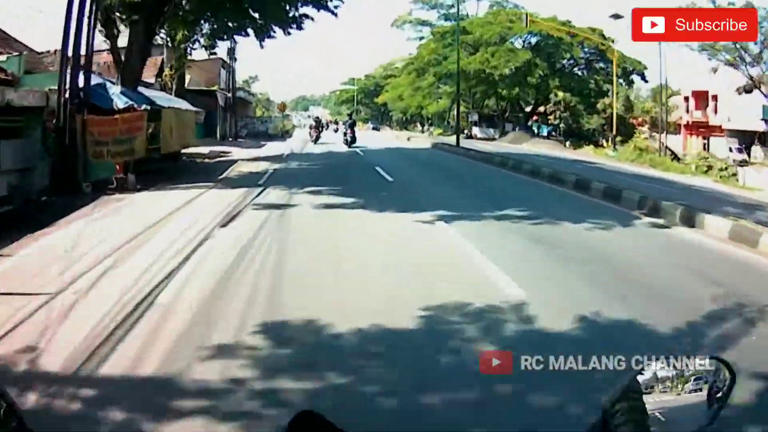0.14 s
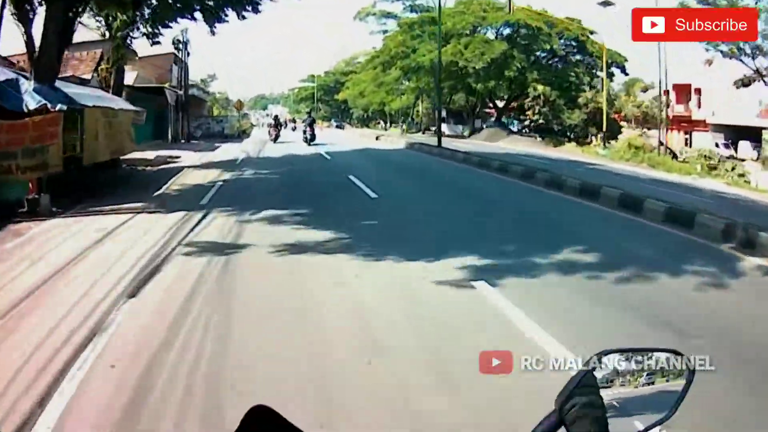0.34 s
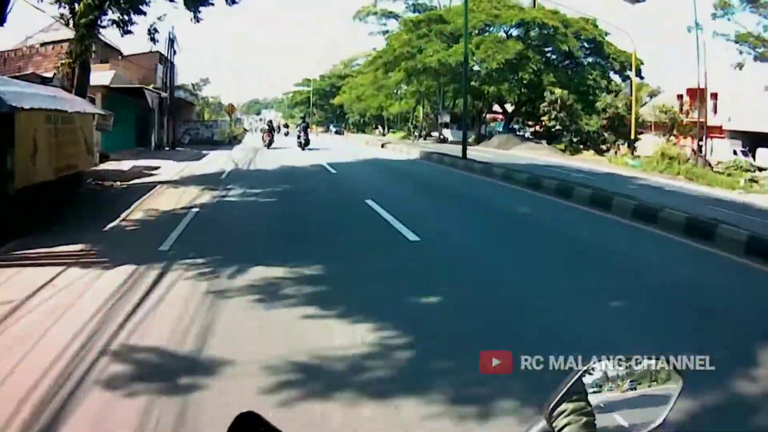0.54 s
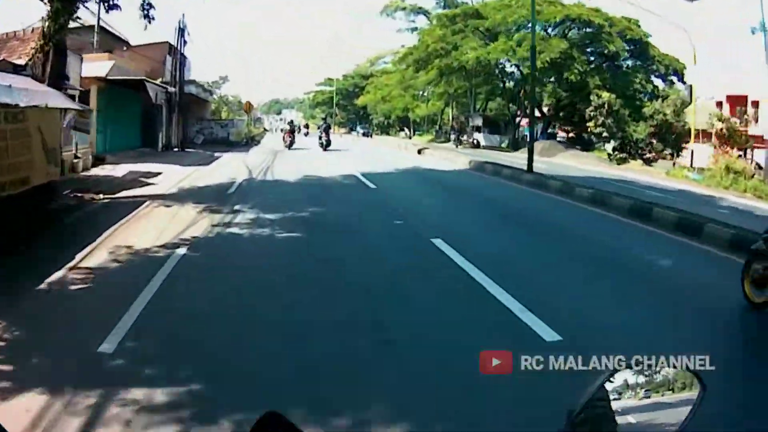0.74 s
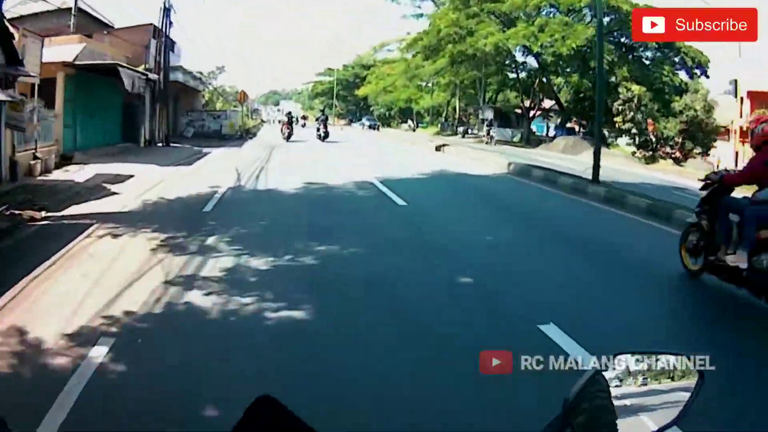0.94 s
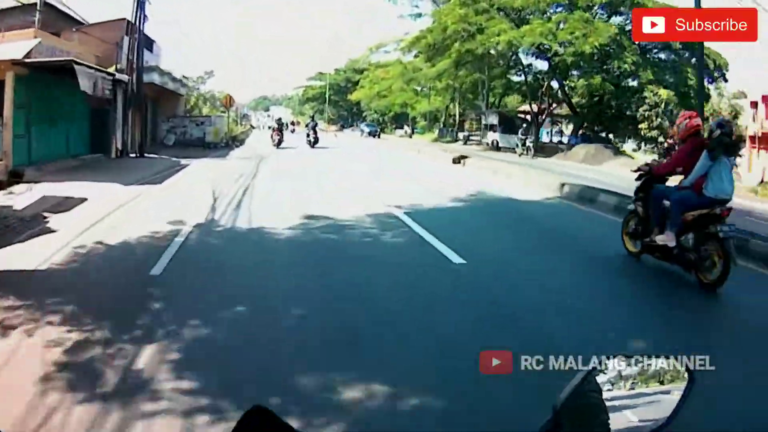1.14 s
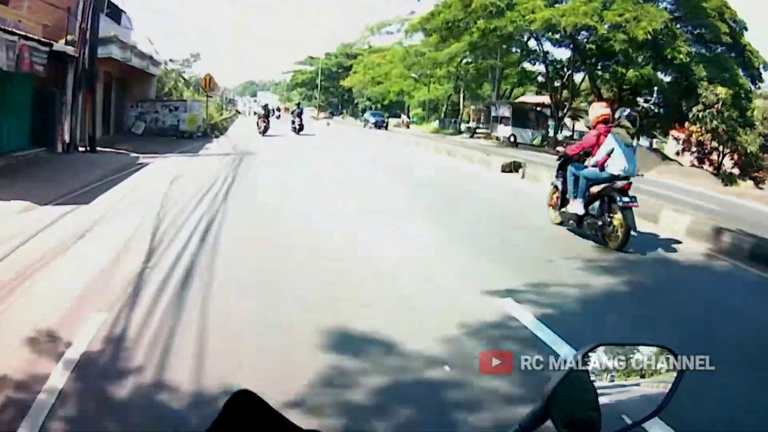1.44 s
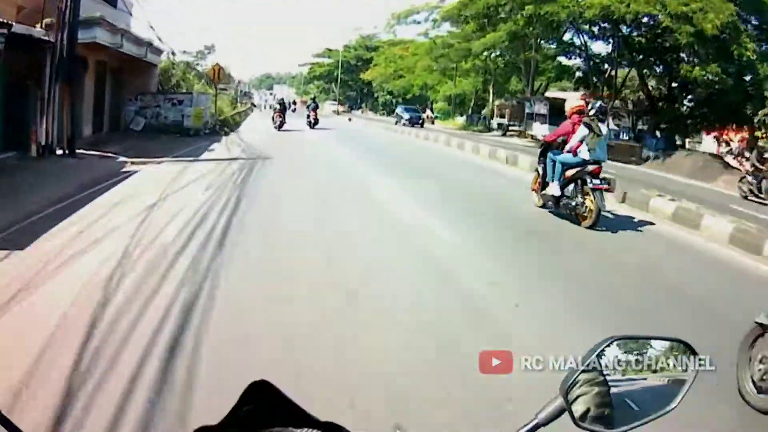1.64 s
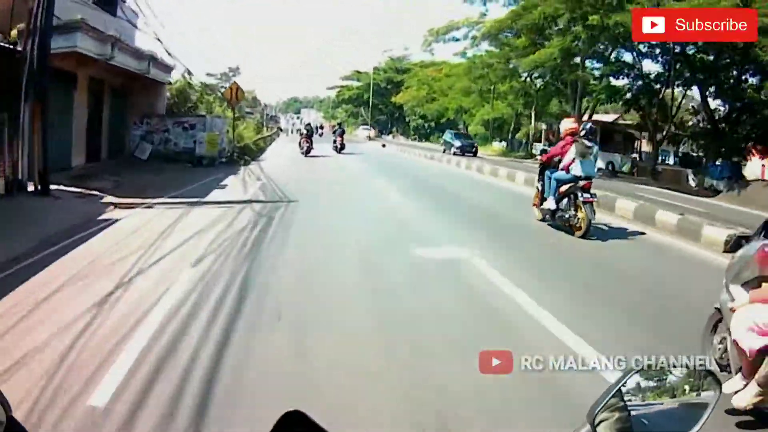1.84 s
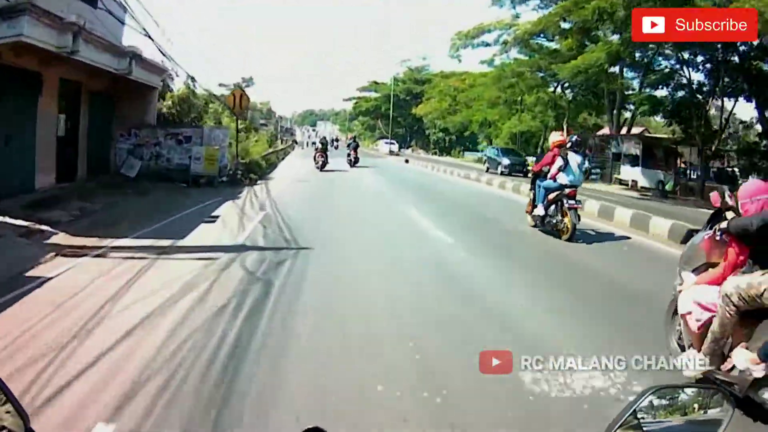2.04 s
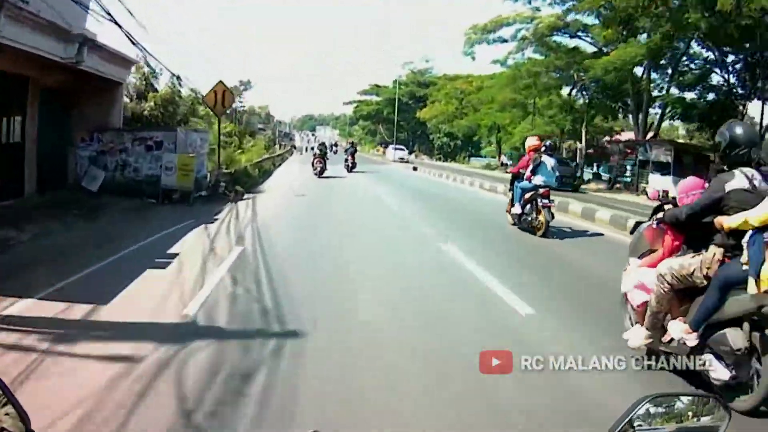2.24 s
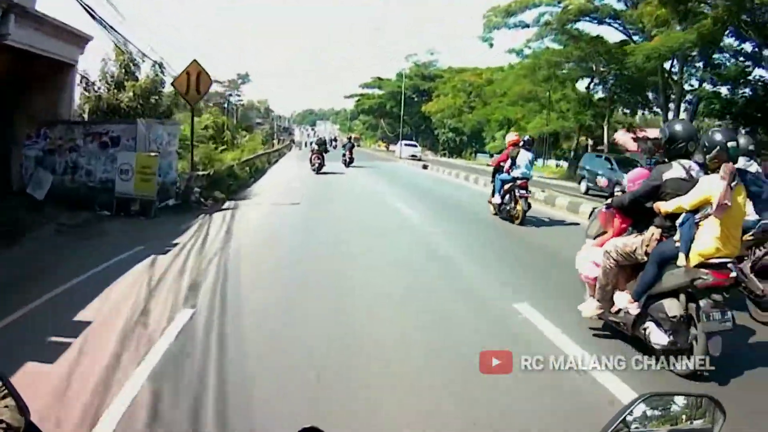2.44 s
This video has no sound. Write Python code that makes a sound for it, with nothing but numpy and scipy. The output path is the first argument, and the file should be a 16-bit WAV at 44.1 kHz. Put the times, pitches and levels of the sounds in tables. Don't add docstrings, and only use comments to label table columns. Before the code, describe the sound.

A single-cylinder motorcycle cruises with a low, slightly unsteady exhaust drone from the start, sagging, revving up a little around 1 s, then easing back to the end. Wind rumbles and thuds constantly on the small rider-worn microphone, ducking the road hiss in gusts. Breathy air whistle enters near 0.4 s; other bikes' tyre roar swells at 0.45 and, strongest, 1.55 s. A tiny tick comes at 2.44 s.

```python
import sys
import numpy as np
from scipy import signal
from scipy.io import wavfile

SR = 44100
rng = np.random.default_rng(int(sys.argv[2]) if len(sys.argv) > 2 else 0)


def natural_amplitude(level_db):
    exponent = np.asarray(level_db, float) / 20
    return 10 ** exponent


def digitize_waveform(pressure):
    field = np.atleast_2d(pressure).T
    bounded = np.clip(field, -1, 1)
    quanta = np.round(bounded * 32767).astype(np.int16)
    wavfile.write(sys.argv[1], SR, quanta)


N = 114660


def rms_one(x):
    return x / np.sqrt(np.mean(x ** 2) + 1e-20)


def in_time(rows):
    s, *columns = np.transpose(rows)
    return [np.interp(np.arange(N) / SR, s, c) for c in columns]


def bump(centre_s, length_s):
    return np.exp(-.5 * ((np.arange(N) / SR - centre_s) / (length_s / 2)) ** 2)


def drift(rate_hz):
    r = np.exp(-80 * np.pi * rate_hz / SR)
    white = rng.standard_normal(N // 40 + 2002)
    slow = signal.lfilter([1], [1, -2 * r, r * r], white)[2000:]
    return np.interp(np.arange(N) / 40, np.arange(len(slow)), rms_one(slow - slow.mean()))


def resonance(x, hz, width_hz):
    r = np.exp(-np.pi * width_hz / SR)
    b = np.array([1, 0, -1]) * (1 - r * r) / 2
    return signal.lfilter(b, [1, -2 * r * np.cos(2 * np.pi * hz / SR), r * r], x)


def banded_noise(spectrum, shared_db, own_db, rate_hz):
    hz, db = np.transpose(spectrum)
    edges_hz = 20 * 2 ** np.arange(0, 9.7, 1 / 3)
    white = rng.standard_normal((2, N + SR))
    together = drift(rate_hz)
    out = 0
    for k, (low, high) in enumerate(zip(edges_hz, edges_hz[1:])):
        level_db = np.interp(np.log(low * high) / 2, np.log(hz), db, left=-150, right=-150)
        sos = signal.butter(3, [low, high], "band", fs=SR, output="sos")
        band = signal.sosfilt(sos, white[k % 2])[SR:]
        out = out + natural_amplitude(level_db + shared_db * together + own_db * drift(rate_hz)) * band
    return rms_one(out)


def sliding_noise(rows, width_hz):
    centre_hz, level_db = in_time(rows)
    cut = signal.butter(2, width_hz / 2, fs=SR, output="sos")
    a, b = signal.sosfilt(cut, rng.standard_normal((2, N)))
    phase = 2 * np.pi * np.cumsum(centre_hz) / SR
    return natural_amplitude(level_db + 0.46 * drift(39.0)) * rms_one(a * np.cos(phase) + b * np.sin(phase))


def squeeze(x, limit_db, share):
    attack_s, release_db_per_s = .003, 300
    fall_db = release_db_per_s * np.arange(N) / SR
    held_db = np.maximum.accumulate(20 * np.log10(np.abs(x) + 1e-9) + fall_db) - fall_db
    r, ahead = np.exp(-1 / (attack_s * SR)), int(attack_s * SR)
    cut_db = signal.lfilter([1 - r], [1, -r], np.maximum(held_db - limit_db, 0) * share)
    return x * natural_amplitude(-np.append(cut_db[ahead:], np.full(ahead, cut_db[-1])))


# start_s, fourth_order_hz (of firing rate), fourth_order_db, second_order_db (re mean fourth)
ENGINE_RUN = [(0, 184, -19, -16), (.12, 180, -21, -9), (.35, 172, -18.5, -6.5), (.47, 179, -21, -1.5),
              (.68, 172, -20, -18.5), (.85, 184, -22, -7.5), (.95, 196, -25.5, -17.5), (1.1, 196, -22, 4.5),
              (1.25, 194, -26.5, 2.5), (1.45, 192.5, -23, 7.5), (1.62, 191, -18.5, 13.5),
              (1.78, 189.7, -22.5, -10), (1.95, 190, -21.5, -8), (2.08, 186, -17.5, 1),
              (2.2, 185, -22, -8.5), (2.35, 185.5, -17.5, 7.5), (2.5, 184.5, -18, -10.5),
              (2.6, 181, -20, 3)]
# multiple_of_firing_rate, level_db (re mean fourth)
WEAK_ORDERS = [(1, -7), (3, -9), (5, -10), (6, -10), (8, -24), (10, -17), (15, -22), (29, -27), (30, -28),
               (35, -34)]
# centre_s, length_s, rise_db
BOOM_SWELLS = [(0.133, 0.13, 6), (0.348, 0.14, 9), (0.584, 0.11, 8.5), (0.717, 0.072, 6), (0.842, 0.027, 5),
               (1.204, .09, 10), (1.315, 0.021, 8), (1.378, 0.022, 13.5), (1.538, .11, 12),
               (1.725, 0.11, 12.5), (1.906, 0.088, 11), (2.036, 0.054, 2.5), (2.214, 0.24, 9),
               (2.551, 0.064, 4)]


def exhaust_drone(turn, fourth_db, second_db):
    mean_db = fourth_db.mean()
    boom_db = np.max([rise_db * bump(s, length_s) for s, length_s, rise_db in BOOM_SWELLS], axis=0)
    orders = [(4, fourth_db + boom_db), (2, mean_db + second_db)]
    orders += [(round(k), mean_db + db) for k, db in WEAK_ORDERS]
    drone = 0
    for k, db in orders:
        level = np.sqrt(2) * natural_amplitude(db + 2.0 * drift(2.4))
        drone = drone + level * np.sin(2 * np.pi * (k * turn + rng.random()))
    return drone


# centre_hz, width_hz, level_db
PIPE_MODES = [(438, 360, -8), (709, 117, -1.5), (1176, 880, -1), (1640, 760, -18.5), (2190, 1200, -6.5)]


def exhaust_bark(turn):
    jitter, spread_db, puff_share, decay_per_firing = .015, 1.6, .85, 1.8
    shaky = np.maximum.accumulate(turn + jitter * drift(22.0))
    strength = natural_amplitude(spread_db * rng.standard_normal(200))[shaky.astype(int) + 1]
    pulses = np.diff(np.floor(shaky), prepend=0) * strength
    puffs = strength * np.exp(-decay_per_firing * (shaky % 1)) * rng.standard_normal(N)
    source = (1 - puff_share) * rms_one(pulses) + puff_share * rms_one(puffs)
    bark = 0
    for k, (hz, width_hz, db) in enumerate(PIPE_MODES):
        mode = resonance(resonance(source, hz, width_hz), hz, 2 * width_hz)
        bark = bark + (-1) ** k * natural_amplitude(db) * rms_one(mode)
    return natural_amplitude(-38) * signal.sosfilt(signal.butter(6, 2300, fs=SR, output="sos"), bark)


def engine():
    fourth_hz, fourth_db, second_db = in_time(ENGINE_RUN)
    turn = np.cumsum(fourth_hz / 4 * (1 + .006 * drift(8.0))) / SR
    return exhaust_drone(turn, fourth_db, second_db), exhaust_bark(turn)


# centre_hz, density_db_per_hz
WIND_SPECTRUM = [(20, -25.5), (45, -2), (70, 2), (125, 0), (170, -0.5), (300, -8), (380, -19.5), (650, -31)]


def wind(lull_db):
    level_db = -10.5 - .6 * lull_db
    return natural_amplitude(level_db) * banded_noise(WIND_SPECTRUM, shared_db=-0.67, own_db=0.96, rate_hz=8.9)


# centre_s, pitch_hz, length_s, level_db
EDDY_THUDS = [(0.03, 100.4, 0.092, -16), (0.116, 136.8, 0.021, -14), (.197, 317, 0.058, -18),
              (0.211, 225.7, 0.056, -12.5), (0.412, 95.93, .17, -13.5), (0.475, 305, 0.055, -21),
              (0.538, 56, 0.07, -12), (0.634, 417.3, 0.055, -25.5), (0.71, 372, 0.063, -28),
              (0.737, 309.3, 0.069, -22.5), (.741, 125.6, 0.12, -17), (.742, 252, 0.058, -17.5),
              (0.748, 477, 0.039, -22), (0.871, 98.75, 0.083, -16), (.96, 65, 0.23, -10.5),
              (1.026, 298, 0.059, -16), (1.146, 98.9, 0.091, -8), (1.228, 471.5, 0.057, -39),
              (1.251, 315, 0.13, -25.5), (1.346, 271.4, 0.16, -24), (1.453, 79.9, .12, -18),
              (1.515, 145, .07, -16), (1.547, 365, 0.092, -26.5), (1.643, 139.5, 0.043, -15.5),
              (1.826, 107, 0.052, -19.5), (1.877, 59.8, 0.066, -16.5), (2.289, 69, 0.059, -15.5),
              (1.872, 290.4, 0.043, -19), (1.98, 524.3, .035, -27), (2.002, 71.7, 0.044, -11),
              (2.002, 234.5, 0.084, -20.5), (2.042, 119.3, 0.069, -15), (2.088, 96.5, 0.13, -10),
              (2.182, 435, 0.033, -26.5), (2.207, 272.6, .1, -18.5), (2.255, 464.5, 0.17, -31),
              (2.309, 107.4, 0.13, -16.5), (2.347, 302.8, 0.065, -20.5), (2.427, 52, .115, -17.5),
              (2.439, 323, 0.058, -20.5), (2.477, 288.5, 0.066, -26.5), (2.574, 320, 0.027, -21),
              (0.798, 633, 0.016, -35), (1.162, 700, .02, -35), (1.614, 673, 0.021, -28.5),
              (1.667, 745, 0.017, -32), (1.814, 715, 0.039, -34), (2.116, 714, 0.018, -25)]


def eddies():
    out = 0
    for s, pitch_hz, length_s, db in EDDY_THUDS:
        cycles = pitch_hz * np.cumsum(1 + 0.01894 * drift(8.85)) / SR
        out = out + np.sqrt(2) * natural_amplitude(db) * bump(s, length_s) * np.sin(2 * np.pi * cycles)
    return out


# start_s, level_db
SHELTER_CURVE = [(0, -0.5), (.1, 0), (.2, -2), (.36, 0.5), (.5, -3), (.58, -1), (.75, -1), (.92, -1.5),
                 (1.1, -1.5), (1.3, 1.5), (1.45, -2), (1.6, -0.5), (1.86, -1), (2.0, -2), (2.14, -1),
                 (2.35, -3.5), (2.45, -1), (2.6, 0)]
# centre_s, depth_db, length_s
SHORT_LULLS = [(.043, 5, 0.02), (0.073, 3, 0.012), (0.128, 3.5, .015), (.195, 3.5, .04),
               (0.247, 3.5, 0.011), (0.277, 5.5, 0.014), (0.427, 5, .022), (0.468, 4.5, 0.014),
               (.495, 6.5, 0.012), (.529, 4, 0.018), (0.62, 5, 0.013), (.642, 5.5, 0.013),
               (0.699, 3.5, .02), (0.744, 3, .05), (0.777, 4, 0.014), (0.814, 2.5, .025),
               (0.844, 6.5, 0.018), (0.957, 2.5, 0.017), (1.03, 4.5, .022), (1.076, 3.5, .02),
               (1.091, 6.5, .014), (1.161, 3.5, .035), (1.245, 3.5, .04), (1.283, 3, .014),
               (1.322, 3.5, .025), (1.375, 4.6, .02), (1.411, 5, 0.011), (1.48, 5, .018), (1.527, 2.5, .04),
               (1.62, 1.5, 0.011), (1.67, 3.5, .018), (1.764, 5, 0.02), (1.805, 3, 0.032),
               (1.898, 3.5, .04), (1.968, 6.5, .06), (2.046, 3.5, 0.017), (2.08, 7.5, 0.012),
               (2.184, 7, 0.031), (2.24, 5, 0.041), (2.313, 6, .016), (2.441, 1.5, 0.034), (2.518, 3, .02),
               (2.574, 2, .03)]
# centre_s, depth_db, length_s
SHARP_GUSTS = [(0.068, 4, 0.0094), (0.107, 2.5, 0.023), (0.3, 4, 0.017), (.379, 3, 0.044), (0.568, 1, .028),
               (0.664, 1.5, 0.029), (0.918, 2, 0.015), (1.053, 3, .025), (1.11, 2.5, .014),
               (1.454, 0.5, .035), (1.598, 2, 0.021), (1.873, 3.5, 0.018), (2.146, 2, 0.027),
               (2.217, 1.5, 0.012), (2.536, 2.5, .012)]


def lulls():
    lull_db = in_time(SHELTER_CURVE)[0]
    lull_db = lull_db + np.max([db * bump(s, length_s) for s, db, length_s in SHORT_LULLS], axis=0)
    lull_db = lull_db - sum(db * bump(s, length_s) for s, db, length_s in SHARP_GUSTS)
    return lull_db - lull_db.mean()


# centre_hz, density_db_per_hz
RUSH_SPECTRUM = [(300, -4), (500, -9), (900, -15.5), (1500, -22.5), (2300, -34), (4400, -38), (6500, -54),
                 (15800, -82.5)]


def rush():
    return natural_amplitude(-28.5) * banded_noise(RUSH_SPECTRUM, shared_db=.35, own_db=1.3, rate_hz=15.0)


# start_s, centre_hz, level_db
PASSING_BIKES = [
    (0, 1312, -54),
    (.45, 1298, -43),
    (.9, 1396, -58.5),
    (1.2, 1650, -49.5),
    (1.55, 1451, -34.5),
    (1.7, 1396, -45.5),
    (1.97, 1376, -41.5),
    (2.25, 1342, -43.5),
    (2.6, 1334, -48),
]


def passing_bikes():
    return sliding_noise(PASSING_BIKES, width_hz=310)


# start_s, centre_hz, level_db
HOUSING_WHISTLE = [
    (0, 3900, -75),
    (.38, 4300, -64.5),
    (.45, 4520, -51.5),
    (.82, 4450, -54.5),
    (.95, 4000, -54),
    (1.2, 3600, -60.5),
    (2.3, 3600, -55),
    (2.6, 3700, -50),
]


def whistle():
    return sliding_noise(HOUSING_WHISTLE, width_hz=850)


def grit_tick():
    return natural_amplitude(-44) * np.diff(bump(2.4407, 4e-5), prepend=0)


def scene():
    lull_db = lulls()
    gusting = wind(lull_db)
    hiss = rush()
    drone, bark = engine()
    port = natural_amplitude(12.0) * squeeze(gusting + eddies() + drone, limit_db=-21, share=.8)
    hiss = hiss + bark + whistle() + passing_bikes()
    return (port + grit_tick() + natural_amplitude(1.05 * lull_db) * hiss)[None]


def roll_off(x):
    return signal.sosfilt(signal.butter(12, 15490, fs=SR, output="sos"), x)


def record(dry):
    ceiling, edge_s = 1.2, .003
    x = dry[0] - .52 * resonance(dry[0], hz=2950, width_hz=400)
    x = signal.sosfilt(signal.butter(2, 38, "high", fs=SR, output="sos"), x)
    x = natural_amplitude(2.5) * squeeze(x, limit_db=-14, share=.2)
    x = ceiling * np.tanh(x / ceiling)
    to_edge = np.minimum(np.arange(N), np.arange(N)[::-1])
    x = x * np.minimum(1, to_edge / (edge_s * SR))
    return roll_off(x[None])


dry = scene()
out = record(dry)
digitize_waveform(out)
```